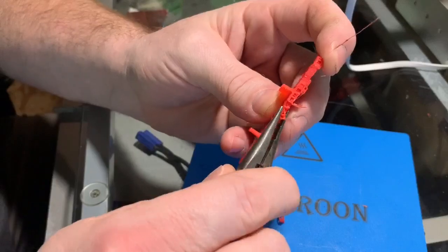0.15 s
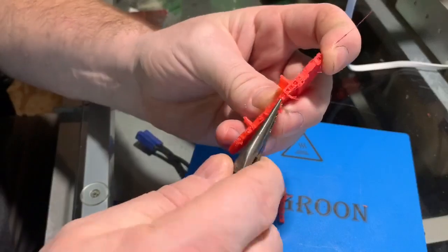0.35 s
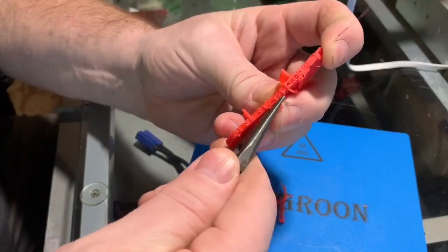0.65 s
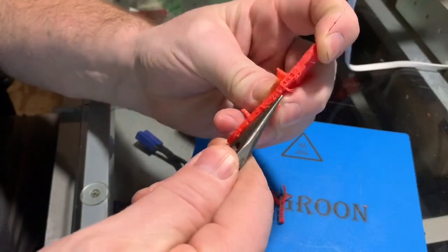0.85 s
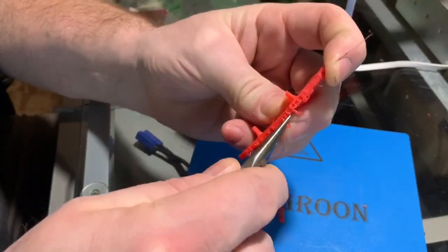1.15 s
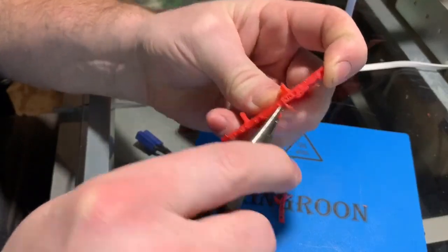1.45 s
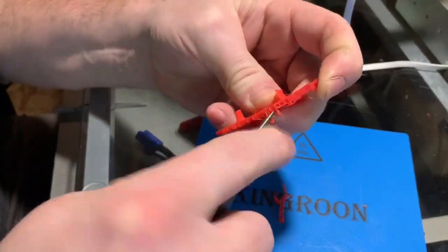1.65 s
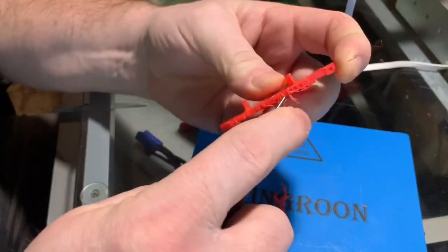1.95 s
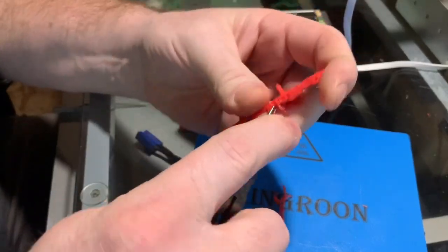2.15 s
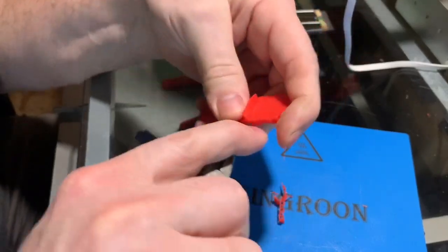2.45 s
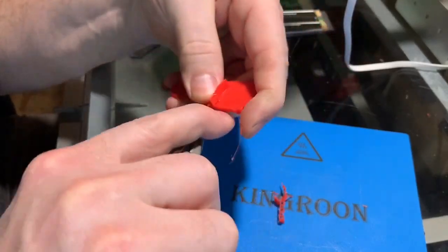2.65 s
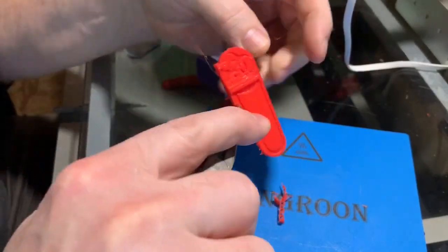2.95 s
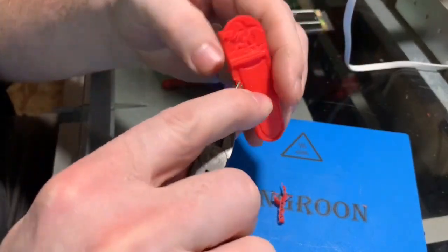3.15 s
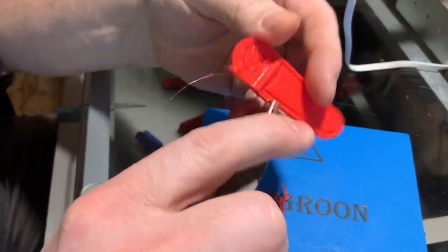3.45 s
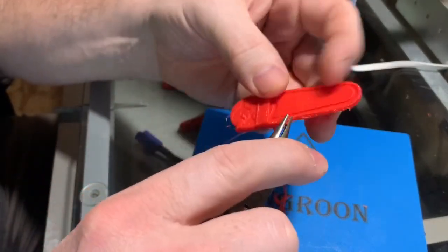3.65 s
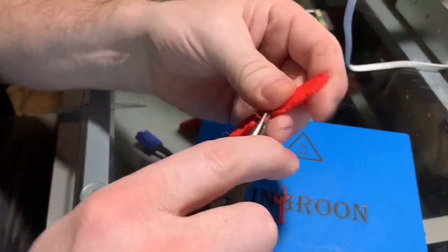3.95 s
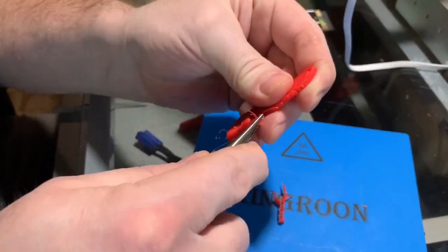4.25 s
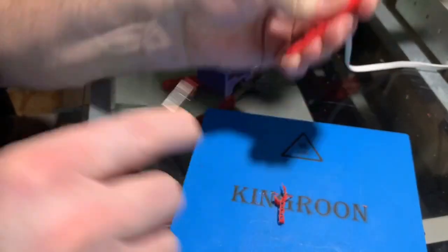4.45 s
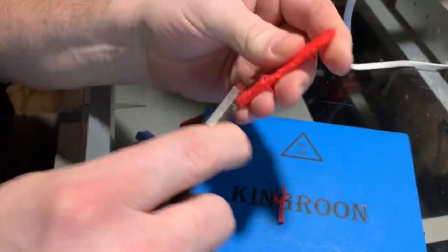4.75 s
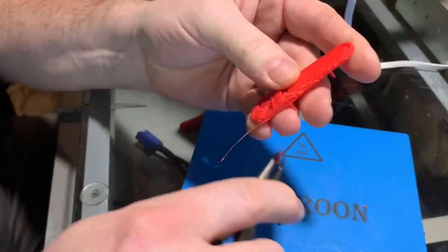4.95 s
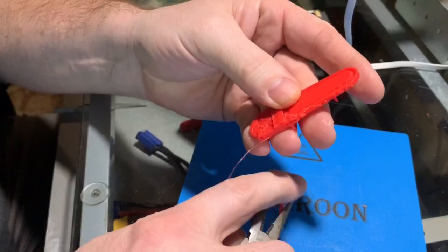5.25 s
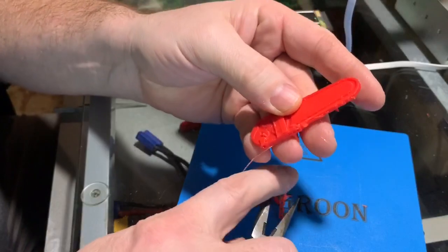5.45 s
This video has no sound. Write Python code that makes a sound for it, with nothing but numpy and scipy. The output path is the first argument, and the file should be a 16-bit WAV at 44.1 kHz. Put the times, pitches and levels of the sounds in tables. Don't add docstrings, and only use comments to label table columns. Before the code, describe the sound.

Pliers snap brittle plastic supports off a small printed part with sharp dry cracks and fine crackle, over a steady low fan hum.

```python
import sys
import numpy as np
from scipy import signal
from scipy.fft import rfft, irfft, next_fast_len
from scipy.io import wavfile
from scipy.ndimage import uniform_filter1d

SR = 44100
rng = np.random.default_rng(int(sys.argv[2]) if len(sys.argv) > 2 else 0)


def dump_mix(stems):
    frames = np.atleast_2d(stems).T
    limited = np.clip(frames, -1, 1)
    pcm = np.round(limited * 32767).astype(np.int16)
    wavfile.write(sys.argv[1], SR, pcm)


def invert_db(x):
    u = np.asarray(x, float) / 20
    return 10 ** u


N = 247577

# f/Hz, level/dB, time to fall 60 dB/s, mode group
PART_MODES = [(1700, -4, .004, 0), (2450, -1, .004, 0), (3000, 0, .003, 0), (3600, 1, .003, 0),
              (4200, -1, .003, 0), (5000, -3, .003, 0), (5900, -4, .002, 1), (6700, -5, .002, 1),
              (7500, 0, .0025, 1), (8200, -1, .002, 1), (9000, -3, .002, 1), (9700, -3, .002, 2),
              (10400, -3, .002, 2), (11300, 0, .002, 2), (12100, 0, .002, 2), (12800, -2, .002, 2),
              (13600, -3, .002, 3), (14400, -1, .002, 3), (15200, 0, .0025, 3), (15900, -4, .002, 3),
              (16500, -12, .002, 3)]
GROUP_HZ = np.array([3000, 7500, 11000, 15000])
# f/Hz, likeness of diffuse sound (0-1), phase offset/rad, left minus right/dB
PORTS = [(60, 0.97, 0.5, -1.5), (290, 0.87, -0.37, -1.5), (495, 0.73, 0.5, -1.5), (665, 0.53, 0.26, 6.5),
         (814, 0.66, 1.14, -2.5), (1570, 0.42, 0.012, 0.5), (2260, 0.3, 1.27, 1), (3530, 0.03, 0.78, -1),
         (5300, 0, 1.6, -5.5), (6140, 0.6, -0.56, -4), (7900, 0.89, -1.01, 1), (13400, 0.84, -0.46, 0),
         (14700, 0.82, -0.73, -0.5), (16600, 0.8, 0, -0.5)]
CRACK_MS, RIP_MS = .31, 1.25


def plastic():
    sharp = struts() + ticks() + cracks() + dull_top(rips())
    return sharp + invert_db(6) * dull_top(tearing())


def struts():
    # t/s, energy/dB, pitch f/Hz
    breaks = [(.2268, -21, 9000), (.2268, -25, 9900), (.2268, -25, 12900), (.2268, -44, 15300),
              (.4143, -31, 9000), (.4143, -25, 10300), (.4143, -33, 12500), (.4143, -39, 15300),
              (1.48, -33, 4200), (1.48, -19, 6000), (1.48, -5, 7600), (1.4799, -5, 10000),
              (1.4799, -6, 11600), (1.4798, -6, 15700), (2.3535, -34, 7700), (2.3535, -34, 10500),
              (2.3535, -25, 13200), (2.3535, -23, 15400), (2.7215, -18, 3400), (2.7225, -19, 6200),
              (2.722, -8, 8100), (2.722, -6, 12300), (2.722, -30, 14500), (2.7328, -21, 3500),
              (2.733, -18, 4300), (2.7335, -23, 5000), (2.7326, -6, 7800), (2.7326, -15, 11500),
              (2.7326, -12, 12600), (2.7338, -13, 13200), (3.6334, -31, 13200), (3.6334, -28, 15000),
              (3.6767, -34, 8800), (3.6767, -33, 13500), (3.6767, -36, 15400), (3.7766, -33, 8900),
              (3.7766, -38, 13700), (3.7766, -21, 15400), (4.3641, -17, 5900), (4.3641, -16, 11600),
              (4.3641, -20, 15000), (4.3641, -19, 8600), (4.3662, -18, 6200), (4.3662, -17, 10800),
              (4.3662, -19, 15000), (4.3682, -24, 5800), (4.3682, -21, 12000), (4.3662, -27, 3300),
              (4.3859, -20, 4200), (4.3862, -17, 5300), (4.3859, -10, 5700), (4.3859, -3, 7700),
              (4.3857, -12, 10100), (4.3857, -20, 12300), (4.3857, -6, 15700), (5.127, -46, 15000)]
    focus_db = 100
    s, db, pitch_hz = np.transpose(breaks)
    forces = np.pad(fracture(len(s), CRACK_MS, size=200), ((0, 0), (0, 500)))
    rows = 0
    for k, (hz, _, t60, _) in enumerate(PART_MODES):
        near = invert_db(-focus_db * np.log2(hz / pitch_hz[:, None]) ** 2)
        tone = ring(ring(forces, hz, t60), hz, t60 / 2)
        rows = rows + (-1) ** k * near * energy_one(tone)
    return bursts(s - .0003, db, energy_one(rows))


def cracks():
    # t/s, energy/dB, brightness/(dB per octave), low modes relative to the energy/dB
    events = [
        (1.0125, -31.5, 8, -9),
        (2.757, -29, 2, -9),
    ]
    return tilted_breaks(events, CRACK_MS)


def rips():
    # t/s, energy/dB, brightness/(dB per octave), low modes relative to the energy/dB
    events = [(0.4495, -38, 0, -6), (1.6525, -34, 4, -14), (1.661, -37, -2, -14), (2.2653, -42, 6, -2),
              (2.6767, -35, 2, -9), (2.688, -30, 1, -9), (2.7016, -20, 0, -10), (2.711, -26, 2, -13),
              (2.7194, -25, -8, 1), (2.723, -22, -6, -6), (2.7372, -20, 10, 1), (2.744, -24, -4, -4),
              (2.7756, -36, -2, -11)]
    return tilted_breaks(events, RIP_MS)


def tilted_breaks(events, length_ms):
    s, db, bright_db, low_db = np.transpose(events)
    upper = db[:, None] + np.outer(bright_db, np.log2(GROUP_HZ[1:] / GROUP_HZ[2]))
    return break_part(s, np.column_stack([db + low_db, upper]), length_ms)


def ticks():
    # t/s, energy/dB, pitch f/Hz
    events = [(0.8632, -33, 5000), (2.2833, -32, 14000), (2.3134, -28, 16500), (4.7391, -43, 11000),
              (4.7595, -45, 12000), (4.8012, -36, 11500), (4.8312, -38, 11000), (4.867, -41, 14500),
              (4.9042, -45, 11000), (4.9441, -36, 16500), (5.352, -38, 11000)]
    focus_db = 42
    s, db, hz = np.transpose(events)
    away = np.log2(GROUP_HZ / hz[:, None])
    return break_part(s, db[:, None] - focus_db * away ** 2, CRACK_MS)


def break_part(s, group_db, length_ms):
    return strike(np.column_stack([s, group_db]), fracture(len(s), length_ms), PART_MODES)


def tearing():
    # peak t/s, level/dB, swell/s, fade/s
    tears = [
        (0.45, -79, .08, 0.066),
        (1.484, -70, .002, 0.044),
        (4.392, -75, .004, 0.049),
        (1.65, -90, 0.028, 0.11),
        (2.29, -85, .06, 0.13),
        (2.732, -61.5, 0.088, 0.032),
        (2.79, -78, .04, 0.19),
        (3.89, -77, .12, .12),
        (4.366, -64, .0025, .013),
        (4.8, -88, .15, .15),
    ]
    level = sum(swell_and_fade(*tear) for tear in tears)
    sizes = invert_db(3.2 * np.minimum(rng.exponential(1, N), 4)) * rng.choice([-1, 1], N)
    per_second = 2500 * invert_db(5 * drift(60))
    crackle = level * rms_one(sizes * (rng.random(N) < per_second / SR))
    return sum((-1) ** k * invert_db(db) * ring(crackle, hz, t60) for k, (hz, db, t60, g) in enumerate(PART_MODES))


def more_thumps():
    # t/s, peak/dB, f/Hz, time to fall 60 dB/s
    more_jolts = [(1.0125, -46, 7100, .006), (2.3535, -38, 7600, .004), (2.7025, -36, 1650, .01),
                  (2.7025, -32, 2800, .006), (2.7205, -27, 3000, 0.0066), (2.7245, -30, 3800, .006),
                  (2.7335, -39, 1020, .015), (2.733, -16, 15000, .005), (2.739, -30, 1650, .008),
                  (2.7385, -23, 13000, .005), (2.7395, -26, 14900, .006), (2.7465, -36, 3700, .006),
                  (2.7475, -31, 7500, .005), (2.689, -38, 10000, .008), (2.7035, -36, 6900, .006),
                  (2.7225, -24, 12400, .004), (2.688, -40, 12400, .008), (2.9, -44, 10000, .005),
                  (2.7785, -44, 6500, .006), (3.7766, -36, 9200, .004), (3.7766, -42, 9800, .004),
                  (3.7766, -33, 13800, .003), (3.7766, -44, 4900, .004), (4.3645, -38.5, 4600, 0.032),
                  (4.3655, -40, 1500, .01), (4.3862, -30, 3050, .004), (4.392, -40, 5700, 0.018),
                  (4.3935, -43, 4900, 0.023), (4.2, -44, 970, 0.13), (0.97, -43, 970, 0.054)]
    return pushes(more_jolts)


def jaws():
    # t/s, then energy/dB of main ring, overtones, low ring
    touches = [
        (4.3642, -60, -60, -20),
        (4.386, -60, -60, -21),
        (5.0115, -32, -60, -60),
        (5.0165, -35, -58.5, -60),
        (5.0275, -29, -22, -31),
        (5.0305, -32, -29, -41),
    ]
    # f/Hz, level/dB, time to fall 60 dB/s, mode group
    modes = [(10150, 0, .03, 0), (9000, 0, .035, 1), (10700, -8, .04, 1), (12600, -1, .014, 1),
             (11600, -9, .008, 1), (13400, -3, .01, 1), (14200, -2, .015, 1), (15600, 0, .025, 1),
             (4740, 0, .035, 2)]
    return steel(touches, modes, length_ms=.3)


def joint():
    # t/s, then energy/dB of main ring, overtones, low ring
    chirps = [
        (5.126, -47, -39, -39),
        (5.139, -42, -38, -50),
        (5.158, -29.5, -39, -44),
        (5.172, -33, -55, -48),
        (5.200, -29.5, -37, -43),
        (5.226, -30, -58, -43),
    ]
    # f/Hz, level/dB, time to fall 60 dB/s, mode group
    modes = [(6720, 0, .045, 0), (11500, 0, .025, 1), (11000, -6, .02, 1), (13500, -5, .015, 1),
             (3850, 0, .035, 2)]
    return steel(chirps, modes, length_ms=2.5)


def steel(touches, modes, length_ms):
    return strike(np.array(touches), fracture(len(touches), length_ms), modes)


def thumps():
    # t/s, peak/dB, f/Hz, time to fall 60 dB/s
    jolts = [(2.684, -34, 2320, 0.015), (2.723, -33, 660, 0.012), (2.7235, -23.5, 1780, 0.0089),
             (2.703, -35, 890, 0.026), (2.741, -34, 800, 0.013), (2.734, -34, 1590, 0.019),
             (2.733, -35, 178, .04), (2.739, -33, 81, 0.027), (2.724, -31.5, 420, 0.022),
             (2.746, -39, 1650, 0.014), (2.686, -36, 2000, .015), (1.48, -34, 2750, 0.0092),
             (4.365, -36, 7700, .008), (2.6, -44, 42.2, 0.26), (4.3857, -29, 2200, 0.011),
             (4.388, -39, 1030, 0.014), (4.387, -29.5, 170, 0.017), (.2268, -44, 5900, .004),
             (.2268, -48, 4300, .004), (.4143, -45, 6160, .004), (3.7766, -47, 4300, .004),
             (3.7766, -51, 5100, .004), (2.3535, -41, 10000, .003), (3.6334, -52, 10300, .003),
             (1.48, -31, 3050, .004), (1.4802, -29, 8800, .003), (2.739, -23, 5900, .005),
             (2.739, -25, 8800, .004), (2.7465, -35, 6000, .006), (4.3645, -35, 2300, .006),
             (4.365, -31, 7900, .006), (1.4801, -38, 5600, .003), (2.7035, -34, 2200, .005),
             (2.7215, -29, 2400, .004), (4.385, -31, 53, 0.12)]
    return pushes(jolts)


def pushes(events):
    out = 0
    for s, db, hz, t60 in events:
        push = np.hanning(int(SR / hz / 4) + 3)
        force = bursts([s], [db], push[None] / push.sum())
        out = out - ring(force, hz, t60)
    return out


def rattle():
    # start t/s, level/dB, time to fall 60 dB/s
    buzzes = [
        (1.481, -56, .12),
        (2.735, -54, .15),
        (4.365, -50, .06),
        (4.387, -48, .16),
    ]
    # f/Hz, level/dB, time to fall 60 dB/s
    modes = [(4650, -1, .015), (5150, 0, .01), (5750, 1, .008)]
    t = np.arange(N) / SR
    level = sum(invert_db(db - 60 * (t - s).clip(0, 1) / t60) * (t > s) for s, db, t60 in buzzes)
    touches = rng.standard_normal((3, N)) * (rng.random(N) < 1500 / SR)
    buzz = sum(invert_db(db) * rms_one(ring(touch, hz, t60)) for touch, (hz, db, t60) in zip(touches, modes))
    return level * rms_one(buzz)


def rustle():
    # peak t/s, level/dB, swell/s, fade/s, pitch f/Hz
    brushes = [(.44, -68, 0.046, .08, 11000), (.88, -62, 0.11, 0.11, 8100), (1.487, -55, .002, .14, 9700),
               (1.66, -68, .02, .08, 8500), (2.29, -68, .08, .1, 13500), (2.69, -56, 0.11, .03, 13200),
               (2.69, -52, .055, .02, 8900), (2.76, -62, .02, .25, 9300), (3.45, -70, .2, .2, 13500),
               (3.65, -65, 0.049, .1, 14000), (3.88, -61, .15, .15, 13800), (4.374, -52, .003, .025, 5300),
               (1.487, -55, .002, .05, 5800), (4.392, -51, .002, .05, 9900), (4.8, -66, .12, .1, 12010),
               (5.15, -66, .06, .12, 13500), (5.36, -72, .03, .06, 12470)]
    focus_db = 90
    grains = rng.standard_normal((2, N)) * (rng.random(N) < 9000 / SR)
    tones = np.array([rms_one(ring(grains[k % 2], hz, t60)) for k, (hz, db, t60, g) in enumerate(PART_MODES)])
    mode_hz = np.array(PART_MODES)[:, 0]
    out = 0
    for s, db, swell, fade, pitch_hz in brushes:
        near = invert_db(-focus_db * np.log2(mode_hz / pitch_hz) ** 2)
        out = out + swell_and_fade(s, db, swell, fade) * rms_one(near @ tones)
    return dull_top(out)


def room(x):
    echo_t60_s, echo_db = .03, -11
    room_t60_s, room_db = .28, -22
    t = np.arange(SR // 3) / SR
    echo = invert_db(echo_db - 60 * t / echo_t60_s) / np.sqrt(echo_t60_s)
    tail = invert_db(room_db - 60 * t / room_t60_s) / np.sqrt(room_t60_s)
    shape = (echo + tail) * np.minimum(t * 1000, 1) / np.sqrt(SR / 14)
    shared, *own = even_colour(rng.standard_normal((3, len(t))) * shape)
    low = signal.butter(2, 6000, fs=SR, output="sos")
    high = signal.butter(2, 6000, "high", fs=SR, output="sos")
    treble = signal.sosfilt(high, shared)
    return np.array([signal.fftconvolve(x, treble + signal.sosfilt(low, o))[:N] for o in own])


def even_colour(tails):
    spectrum = rfft(tails)
    power = abs(spectrum) ** 2
    return irfft(spectrum * np.sqrt(power.mean() / uniform_filter1d(power, size=200)), tails.shape[1])


def hum():
    # t/s, f/Hz, level/dB
    sway = [(0.0, 285, -59), (0.06, 284, -52.5), (0.64, 278.8, -60.5), (0.86, 285.4, -61),
            (1.44, 277.4, -53), (1.8, 281.4, -51), (1.83, 283.5, -56.5), (2.26, 281.6, -51),
            (2.95, 282.6, -55), (3.2, 281.4, -48), (3.67, 281.3, -52.5), (5.36, 278.1, -51),
            (5.61, 277.9, -59)]
    # f/Hz, rms level/dB
    mains = [(120, -62.5), (240, -66), (360, -65.5)]
    trim_db, waver_rad = -0.5, 0.52
    t = np.arange(N) / SR
    s, hz, db = np.transpose(sway)
    phase = 2 * np.pi * np.cumsum(np.interp(t, s, hz)) / SR
    level = invert_db(np.interp(t, s, db) + trim_db + 2.0 * drift(15))
    throb = 1 + 0.27 * np.sin(phase / 21)
    tone = level * np.sin(phase + waver_rad * drift(2.8)) * throb
    lines = 0
    for hz, db in mains:
        lines = lines + invert_db(db + 1.6 * drift(7.4)) * np.sin(2 * np.pi * hz * t + rng.uniform(0, 6.2))
    return np.sqrt(2) * (tone + lines)


def air():
    # f/Hz, level/(dB per Hz)
    rush = [(45, -7), (200, -11), (450, -10), (800, -5), (1100, -13), (1800, -14), (2500, -20.5),
            (3600, -21.5), (4500, -27.5), (6000, -29.5), (7700, -38), (10200, -37), (15600, -42),
            (16050, -66)]
    # f/Hz, width/Hz, level above the air/dB
    housing = [(71.3, 7.5, 8), (97.6, 7.7, 9.5), (158.7, 35, 7.5), (280.6, 56.5, 13), (368, 16, 8),
               (422, 30, 7.5), (559.3, 10.3, 8), (860, 11, 5.5), (961.7, 47, 11.5), (1199, 31, 5),
               (1473, 26, 5), (1713, 27, 8), (2165, 104, 9.5), (2863, 510, 6.5), (3350, 230, 1.5),
               (4790, 270, 7.5), (6860, 370, 8), (8900, 790, 10.5), (13800, 1800, 3)]
    air_db = -45.5
    size = next_fast_len(N)
    hz = np.arange(size // 2 + 1) * SR / size
    peaks_db = sum(db / (1 + (2 * (hz - f) / width) ** 2) for f, width, db in housing)
    colour = invert_db(at_hz(rush, hz) + peaks_db)
    alike = np.clip(at_hz(PORTS, hz), 0, 1)
    mid, side = rfft(rng.standard_normal((2, size))) * colour
    pair = np.sqrt(1 + alike) * mid + np.sqrt(1 - alike) * side * np.array([[1], [-1]])
    octave = np.clip(np.log2(hz / 125 + 1e-9), 0, 7)
    noise = 0
    for k in range(8):
        band = irfft(pair * np.clip(1 - abs(octave - k), 0, 1), size)[:, :N]
        noise = noise + invert_db(1.35 * drift(3.3)) * band
    return invert_db(air_db + 0.39 * drift(13.0)) * rms_one(noise)


def fracture(count, length_ms, size=600):
    t = np.arange(1, size + 1) / SR * 1000 / length_ms
    return rng.standard_normal((count, size)) * t ** np.clip(length_ms - .3, 0, 1) * np.exp(-1.1 * t)


def strike(events, forces, modes):
    skirt_share = .8
    s, track = events[:, 0] - .0002, np.zeros(N)
    scatter = invert_db(1.5 * rng.standard_normal((len(s), len(modes))))
    forces = np.pad(forces, ((0, 0), (0, 2000)))
    for group in range(events.shape[1] - 1):
        rows = 0
        for k, (hz, db, t60, g) in enumerate(modes):
            if round(g) == group:
                rows = rows + (-1) ** k * invert_db(db) * scatter[:, [k]] * energy_one(ring(forces, hz, t60))
        cut_hz = skirt_share * min(hz for hz, db, t60, g in modes if round(g) == group)
        rows = signal.sosfilt(signal.butter(4, cut_hz, "high", fs=SR, output="sos"), rows)
        track += bursts(s, events[:, group + 1], energy_one(rows))
    return track


def ring(force, hz, t60):
    r, w = invert_db(-60 / (t60 * SR)), 2 * np.pi * hz / SR
    return signal.lfilter([0, np.sin(w)], [1, -2 * r * np.cos(w), r * r], force + 1e-18)


def bursts(times, level_db, shapes):
    track = np.zeros(N + shapes.shape[1])
    for s, db, shape in zip(times, level_db, shapes):
        track[round(s * SR):][:len(shape)] += invert_db(db) * shape
    return track[:N]


def swell_and_fade(s, db, swell, fade):
    t = np.arange(N) / SR
    return invert_db(db - 21 * np.maximum((s - t) / swell, (t - s) / fade).clip(0, 9.0))


def drift(rate):
    r = np.exp(-80 * np.pi * rate / SR)
    slow = signal.lfilter([1], [1, -2 * r, r * r], rng.standard_normal(N // 40 + 2002))[2000:]
    return np.interp(np.arange(N) / 40, np.arange(len(slow)), rms_one(slow))


def dull_top(x):
    return signal.sosfilt(signal.cheby2(10, 50, 16300, fs=SR, output="sos"), x)


def rms_one(x):
    return x / np.sqrt(np.mean(x ** 2) + 1e-20)


def energy_one(rows):
    return rows / np.sqrt((rows ** 2).sum(1, keepdims=True))


def at_hz(rows, hz, axis=1):
    rows = np.array(rows)
    return np.interp(np.log(hz + 1), np.log(rows[:, 0]), rows[:, axis])


def scene():
    hands = plastic() + more_thumps() + jaws() + joint() + thumps()
    return hands + dull_top(room(hands)) + rattle() + rustle() + hum() + air()


def roll_off(x):
    return signal.sosfilt(signal.butter(12, 17010, fs=SR, output="sos"), x)


def record(dry):
    lead = 8.53
    size = next_fast_len(N + 4096)
    hz = np.arange(size // 2 + 1) * SR / size
    phase = 2 * np.pi * hz * lead / SR + at_hz(PORTS, hz, axis=2)
    half = invert_db(-at_hz(PORTS, hz, axis=3) / 2) * np.exp(.5j * phase)
    ports = irfft(rfft(dry, size) * np.array([1 / half, half]), size)[:, :N]
    ports = signal.sosfilt(signal.cheby2(10, 60, 17100, fs=SR, output="sos"), ports)
    ports = signal.sosfilt(signal.butter(6, 42, "high", fs=SR, output="sos"), ports)
    return roll_off(ports)


dry = scene()
out = record(dry)
dump_mix(out)
```